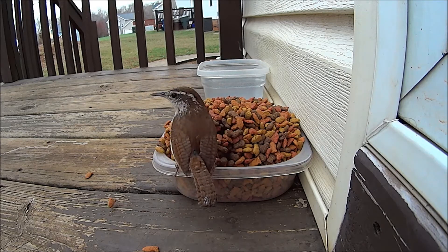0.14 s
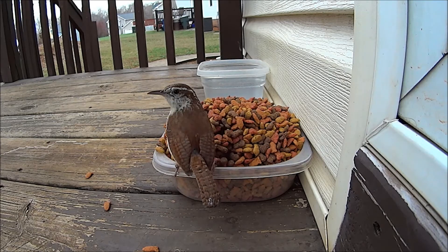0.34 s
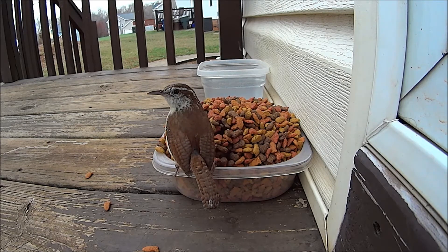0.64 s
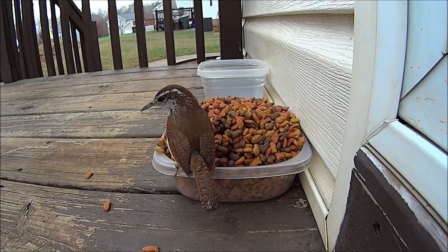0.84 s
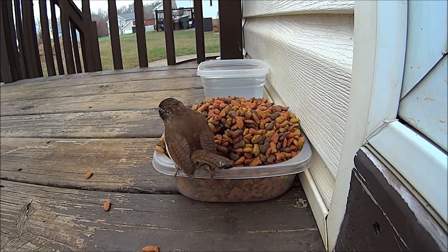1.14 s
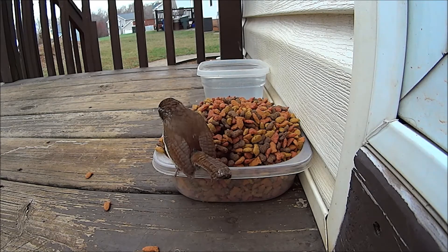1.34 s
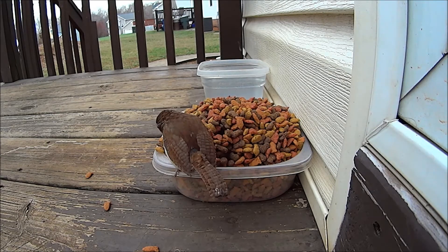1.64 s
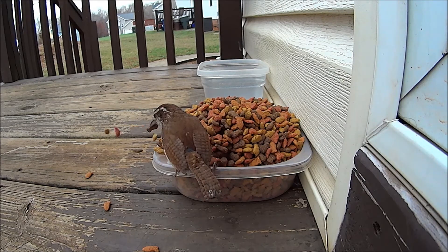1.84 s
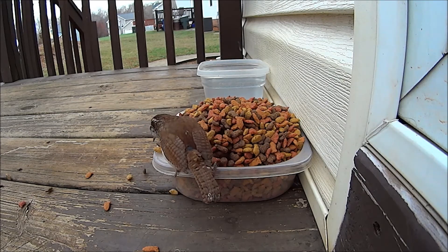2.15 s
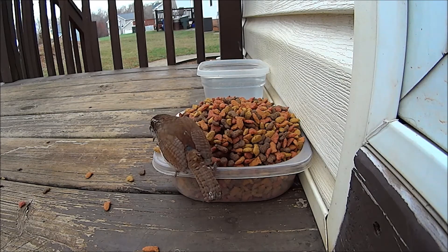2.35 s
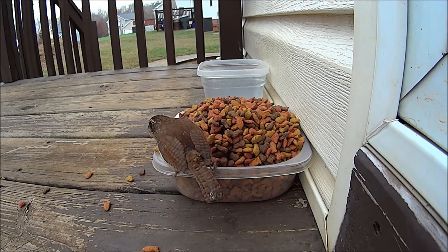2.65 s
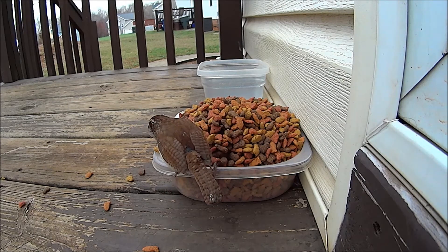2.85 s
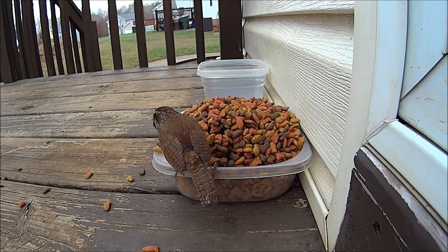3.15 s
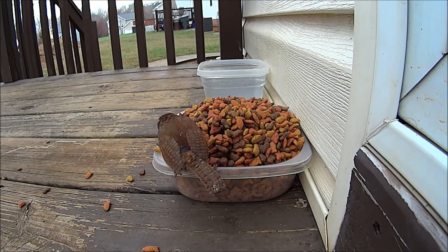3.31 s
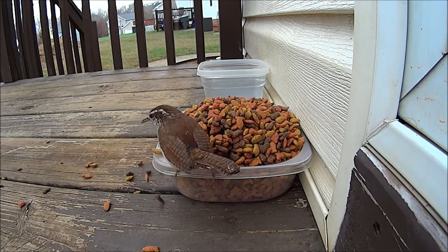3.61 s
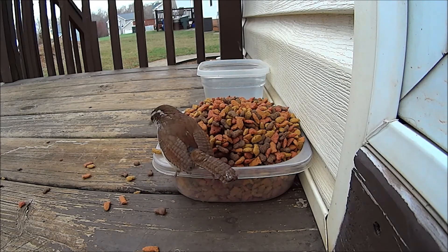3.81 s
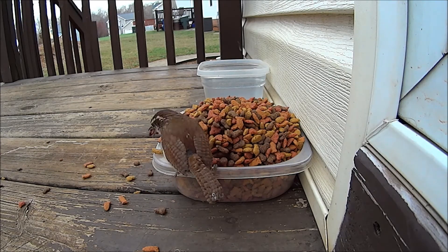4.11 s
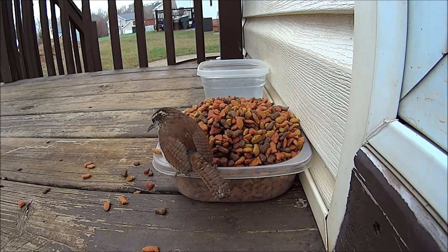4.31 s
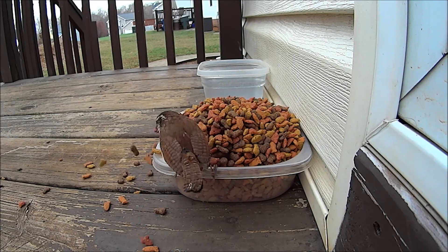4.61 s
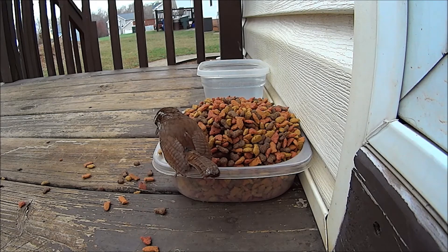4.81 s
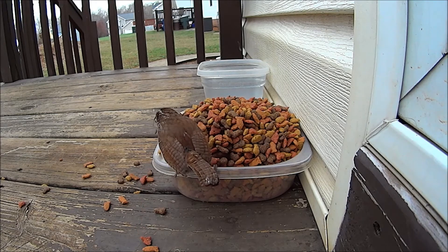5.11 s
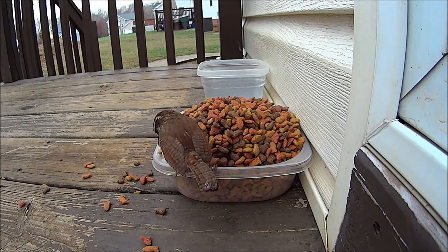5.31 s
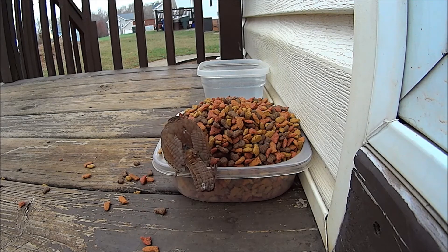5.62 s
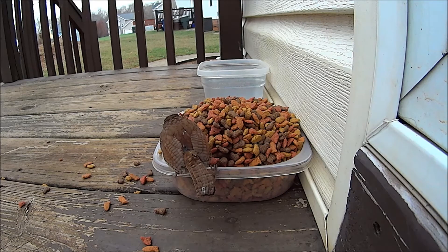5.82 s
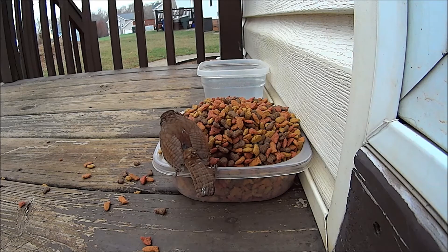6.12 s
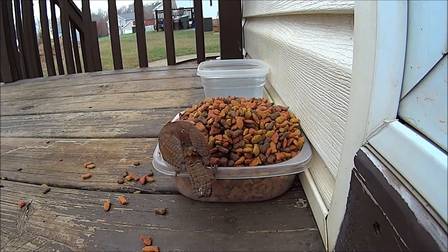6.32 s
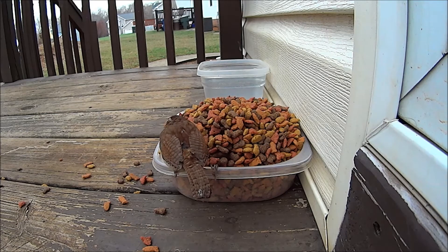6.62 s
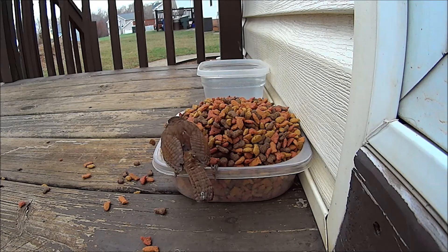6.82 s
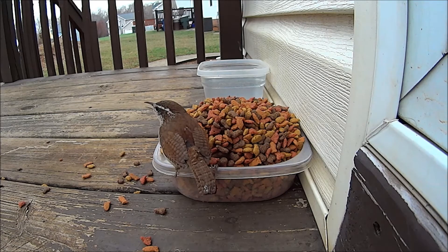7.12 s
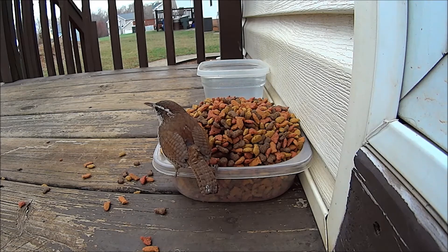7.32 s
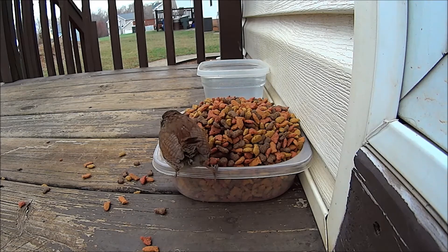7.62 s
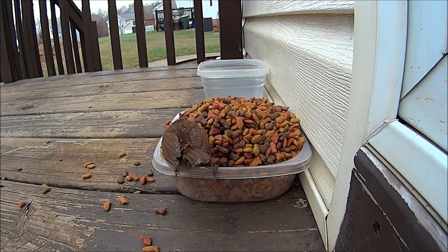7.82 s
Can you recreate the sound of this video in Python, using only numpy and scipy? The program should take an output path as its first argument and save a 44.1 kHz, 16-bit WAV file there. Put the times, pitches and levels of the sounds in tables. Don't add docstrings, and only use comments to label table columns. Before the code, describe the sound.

Close stereo pickup of pellets being flicked about: a few hard clacks at once, a pause, then dense rattling bursts with ticks, rim knocks and drops onto boards. Behind them lie airy hiss, dull traffic rumble and thin far-off bird whistles. A clear, bright bird song swells through five quick repeated phrases with outdoor echo, while the pellet noise continues, then thins to sparse clicks and distant calls.

```python
import sys
import numpy as np
from scipy import signal
from scipy.fft import rfft, irfft, next_fast_len
from scipy.io import wavfile
from scipy.ndimage import uniform_filter1d, map_coordinates

SR = 44100
rng = np.random.default_rng(int(sys.argv[2]) if len(sys.argv) > 2 else 0)


def to_linear_factor(level_db):
    exponent = np.asarray(level_db, float) / 20
    return 10 ** exponent


def generate_wav(sig):
    pcm = np.round(np.clip(np.atleast_2d(sig).T, -1, 1) * 32767).astype(np.int16)
    wavfile.write(sys.argv[1], SR, pcm)


N = 350595

# frequency in Hz, lead in radians.
FAR_LEAD = [(30, 0.27), (100, 0.49), (340, 1.36), (850, 2.55), (2000, 1.96), (3500, 1.17), (6000, 1.27),
            (11000, 0.62)]
# frequency in Hz, left minus right in dB.
FAR_BALANCE = [(60, -0.5), (600, 2), (1500, 2), (2600, 5), (5000, 1.5), (11000, 0)]


def along(points, hz):
    f, v = np.transpose(points)
    return np.interp(np.log(hz + 1), np.log(f + 1), v)


def unit(x):
    return x / np.sqrt(np.mean(x ** 2) + 1e-20)


def wobble(rate, size=N):
    knots = rng.standard_normal(int(size * rate / SR) + 4)
    return map_coordinates(knots, [np.arange(size) * rate / SR])


def filtered(x, response):
    m = next_fast_len(N + 8192)
    return irfft(rfft(x, m) * response(np.fft.rfftfreq(m, 1 / SR)), m)[..., :N]


def band(x, lo_hz, hi_hz):
    return signal.sosfilt(signal.butter(2, [lo_hz, hi_hz], "bandpass", fs=SR, output="sos"), x)


def add(track, s, sound):
    part = track[max(round(s * SR), 0):][:len(sound)]
    part += sound[:len(part)]


def ports(x, lead, left_db):
    half = np.array([[.5], [-.5]])
    return filtered(x, lambda hz: to_linear_factor(half * along(left_db, hz)) * np.exp(1j * half * along(lead, hz)))


def yard(x, walls_db, wet_db, hill_db=-24):
    # frequency in Hz, t60 in seconds.
    fading = [(1500, 1), (2500, 0.24), (3500, 0.44), (5000, 0.44), (9000, 0.12)]
    # echo delay in seconds, level in dB.
    house_walls = [(.006, -13), (.013, -13), (.021, -13), (.033, -13), (.047, -14), (.062, -15), (.09, -21)]
    gap_s, hill_s, hill_t60 = .008, .19, 1.2

    hz, t, z = signal.stft(rng.standard_normal((3, SR)), SR, nperseg=256)
    tail = signal.istft(z * to_linear_factor(-60 * t / along(fading, hz)[:, None]), SR, nperseg=256)[1]
    tail = tail[:1] + 1.17 * tail[1:]
    tail = np.pad(tail, ((0, 0), (round(gap_s * SR), 0)))

    size = tail.shape[1]
    late = np.arange(size) / SR - hill_s
    dull_noise = unit(uniform_filter1d(rng.standard_normal(size), size=7))
    early_level = tail[:, :SR // 20].std()
    tail += early_level * to_linear_factor(hill_db - 60 * late / hill_t60) * (late > 0) * dull_noise
    tail *= to_linear_factor(wet_db) / np.linalg.norm(tail[0])
    for delay, db in house_walls:
        tail[:, round(delay * SR)] += to_linear_factor(db + walls_db)
    echoes = signal.oaconvolve(x[None], tail, axes=1)[:, :N]

    drift = np.arange(N) + 2.8 * wobble(40)
    port = np.repeat([[0], [1]], N, axis=1)
    return x + map_coordinates(echoes, [port, np.tile(drift, (2, 1))], order=2, mode="nearest")


def rush(spectrum, patchy_db):
    # frequency in Hz, likeness of the ports from 0 to 1.
    likeness = [(60, 1), (600, 0.94), (1000, 0.6), (2000, 0.99), (5000, 0.65), (8000, 0.79), (10500, 0.64)]
    z = signal.stft(rng.standard_normal((2, N)), nperseg=512)[2]
    field = uniform_filter1d(rng.standard_normal(z.shape[1:]), 4, 0)
    field = uniform_filter1d(field, 10, 1)
    pair = signal.istft(z * to_linear_factor(patchy_db * unit(field)), nperseg=512)[1][:, :N]

    def spread(hz):
        turn = np.arccos(np.clip(along(likeness, hz), 0, 1)) / 2
        return to_linear_factor(along(spectrum, hz)) * [np.cos(turn), np.sin(turn)]

    same, other = filtered(pair, spread)
    both = ports(np.array([same + other, same - other]), FAR_LEAD, FAR_BALANCE)
    return both / np.sqrt(np.mean(both.mean(0) ** 2))


def air():
    # frequency in Hz, level in dB per Hz.
    traffic = [(12, -57.5), (20, -13), (87, 0), (195, -9), (346, -10), (558, -11.5), (595, -9), (634, -20),
               (900, -36), (1170, -66), (1980, -120)]
    # frequency in Hz, level in dB per Hz.
    hiss_tone = [(410, -19.5), (700, 3), (777, 2), (1560, -3), (2980, -7), (3850, -8.5), (10600, -19),
                 (11200, -17), (14600, -63), (22000, -120)]
    # frequency in Hz, level in dB.
    bird_blur = [(1800, -57), (2300, 4.5), (2600, -1.5), (3000, -1.5), (3600, 0.5), (4100, -20),
                 (4800, -16.5)]
    # time in seconds, then rumble, hiss and chorus levels in dB.
    fades = [(0.0, -42.5, -67, -59), (5.36, -40, -63.5, -53), (7.95, -40.5, -65.5, -71)]
    s, *levels = np.transpose(fades)
    rumble_db, hiss_db, chorus_db = [np.interp(np.arange(N) / SR, s, v) for v in levels]
    rumble = to_linear_factor(rumble_db + .8 * wobble(3)) * rush(traffic, patchy_db=.8)
    hiss = to_linear_factor(hiss_db + 10.0) * rush(hiss_tone, patchy_db=-1.56)
    chorus = to_linear_factor(chorus_db - 4) * rush(bird_blur, patchy_db=2.5)
    return rumble + hiss + chorus


def whistle(rows, rough, waver, overtones=((1, 0),), colour=((1000, 0),)):
    s, hz, db = np.transpose(rows)
    t = np.arange(s[0], s[-1], 1 / SR)

    def smooth(v):
        return uniform_filter1d(np.interp(t, s, v), size=130, mode="nearest")

    pitch = smooth(hz) * (1 + 0.024 * waver * np.tanh(wobble(90, size=len(t))))
    edge = np.minimum(1, np.minimum(t - t[0], t[-1] - t) / 0.002)
    turns = np.cumsum(pitch) / SR + rng.random()
    tone = 0
    for k, overtone_db in overtones:
        tone = tone + to_linear_factor(overtone_db + along(colour, k * pitch)) * np.sin(2 * np.pi * k * turns)
    return tone * edge * to_linear_factor(smooth(db) + 6.0 * rough * wobble(183.0, size=len(t)))


def trill():
    # time in seconds, pitch in Hz, level in dB.
    start = [(2.742, 765, -6), (2.751, 1147, -5), (2.763, 1220, 0), (2.778, 1135, -1), (2.79, 1135, -5)]
    # time in ms, pitch in Hz, level in dB.
    turn = [(0, 1400, 2), (5.06, 1800, 7), (13, 1810, 2.5), (21.02, 1600, 8), (25.61, 1250, -10),
            (31.5, 1080, 4), (34.8, 1200, -8)]
    # start in seconds, level in dB.
    repeats = [(2.797, 1), (2.837, -1), (2.879, -1.5), (2.92, -2.5), (2.961, -5), (3.004, -6.5),
               (3.044, -24)]
    # multiple of the pitch, level in dB.
    partials = [(1, -38.5), (2, -40)]
    # frequency in Hz, level in dB.
    throat = [(900, -10), (1150, -1), (1400, 2), (1700, 0), (2400, 4.5), (3050, -1), (3350, -26)]
    turns = [(s + ms / 1000, hz, db + rel) for s, db in repeats for ms, hz, rel in turn]
    return start[0][0], whistle(start + turns, .35, .4, partials, throat)


def far_birds():
    # start in seconds, length in seconds, from Hz, to Hz, level in dB.
    calls = [(.0, 0.018, 3020, 3080, -44), (0.328, 0.07, 2690, 2680, -57), (.95, .07, 2390, 2370, -62),
             (1.268, .05, 3350, 3670, -62), (7.063, 0.036, 2400, 3120, -53),
             (0.947, 0.085, 3330, 2950, -63), (1.12, 0.034, 2800, 3520, -53.5),
             (1.288, 0.032, 2900, 3640, -55.5), (1.496, 0.068, 3620, 4020, -61),
             (2.258, 0.046, 3250, 4000, -55), (2.453, 0.052, 3460, 3650, -57),
             (2.476, .016, 5460, 4770, -55), (2.533, 0.24, 3005, 2990, -60), (3.15, 0.1, 2760, 2670, -56),
             (3.99, 0.11, 3030, 2996, -45.5), (5.829, 0.016, 6800, 6120, -51.5),
             (6.017, 0.059, 3900, 3900, -53), (6.154, 0.025, 3950, 3940, -56),
             (6.417, 0.038, 3200, 3900, -59), (1.662, 0.05, 3270, 3800, -60),
             (7.879, 0.09, 2940, 3180, -49)]
    # start in seconds, level in dB.
    repeats = [(7.155, -54.5), (7.337, -50.5), (7.513, -50), (7.69, -49.5), (7.865, -50.5)]
    # start in seconds, length in seconds, from Hz, to Hz, level in dB.
    motif = [
        (0, .026, 2330, 3670, 2),
        (.03, .035, 3620, 3590, -10),
        (.07, .015, 3200, 2400, -2),
        (.11, .028, 2470, 2430, 0),
        (0, .045, 2370, 2350, -7),
    ]
    # drop in seconds, hold in seconds, level in dB.
    high_calls = [(1.437, 0.028, -57), (2.409, .042, -54), (3.678, 0.035, -52), (5.45, 0.026, -53),
                  (5.93, 0.035, -46.5)]
    # start in seconds, level in dB.
    hoots = [(0.482, -49), (1.252, -49.5)]
    # time in seconds, pitch in Hz, level in dB.
    hoot_arch = [(0, 1202, -5), (.03, 1546, -0.5), (.075, 1570, -8), (.105, 1330, -8)]
    voice = np.zeros(N)

    slurs = list(calls)
    for s, db in repeats:
        slurs += [(s + ds, length, a, b, db + rel) for ds, length, a, b, rel in motif]
    for s, hold, db in high_calls:
        slurs.append((s - hold, hold, 6820, 6820, db - 4))
        slurs.append((s, .027, 6650, 5900, db))
    for s, length, from_hz, to_hz, db in slurs:
        middle = (length / 2, (from_hz + to_hz) / 2, db)
        rows = [(0, from_hz, db - 0.5), middle, (length, to_hz, db + 1)]
        add(voice, s, whistle(rows, rough=0.54, waver=0.13))

    for s, db in hoots:
        add(voice, s, to_linear_factor(db) * whistle(hoot_arch, .3, .1))

    for when, pitch, slur, size in rng.random((80, 4)):
        hz = 3000 * (.8 + .45 * pitch)
        arc = [(0, hz, -6), (.025, hz * (.9 + .25 * slur), 0), (.06, hz * (.8 + .4 * slur), -6)]
        add(voice, when * N / SR, to_linear_factor(-69 + 5 * size) * whistle(arc, .9, .4))

    add(voice, *trill())
    return ports(yard(voice, walls_db=-3, wet_db=-7), FAR_LEAD, FAR_BALANCE)


def singer():
    # time in ms, pitch in Hz, level in dB.
    rise = [
        [(0, 2480, -14), (5, 2590, -3), (14, 2660, 0), (22, 2710, -1), (25, 2720, -30)],
        [(0, 3800, -18), (5, 3300, -13), (10, 2980, -4), (19, 2915, 0), (24, 2980, -22)],
        [(0, 3020, -12), (5, 3230, -2), (12, 3630, 0), (19, 3860, -2), (25, 3920, -22)],
        [(0, 4300, -14), (5, 4850, -9), (11, 5100, -5), (40, 5200, 0), (80, 5170, -5), (100, 5150, -22)],
    ]
    # time in ms, pitch in Hz, level in dB.
    fall = [
        [(0, 3950, -24), (7, 3450, -15), (13, 3010, -7), (21, 2815, 0), (26, 2740, -24)],
        [(0, 2560, -20), (8, 2530, -3), (16, 2508, 0), (48, 2495, -3), (60, 2490, -14), (94, 2500, -15),
         (99, 2500, -30)],
        [(0, 2900, -6), (6, 2300, 0), (15, 1950, -2), (30, 1750, -10), (60, 1560, -14), (95, 1450, -26)],
    ]
    # rising and falling half starts in seconds, effort in dB, first note's extra dB.
    phrases = [
        (3.6035, 3.798, -6.5, 0),
        (4.077, 4.2775, -3, -0.5),
        (4.55, 4.745, -0.34, -3),
        (5.023, 5.224, -.2, -1),
        (5.499, 5.7015, 0.25, 0),
    ]
    # pitch ratio, waver from 0 to 1, level in dB.
    high_notes = [(.994, 0.28, -36.5), (1.001, 0, -31), (.99, 0.26, -27), (1.005, 0.6, -27),
                  (0.974, 0.62, -32)]
    # start in seconds, level in dB, dB per dB of effort.
    rise_beat = [(0, -15, 2), (0.041, -11.5, 1.34), (0.064, -12, 1.47), (.114, 0, 0)]
    # start in seconds, level in dB, dB per dB of effort.
    fall_beat = [(0, -9.5, 1.52), (0.0433, -14.5, 1.2), (.146, -26.5, 0.3)]
    flutter = [.12, .12, .2, .9, .12, .2, .5]
    # frequency in Hz, left port's lead in radians.
    song_lead = [(1500, 2.14), (2500, 1.04), (3100, 1.18), (3500, 0.25), (4000, 1.97), (5200, .15)]
    # frequency in Hz, left minus right in dB.
    song_balance = [(1500, 5), (2100, 2), (2600, 4.5), (3100, 1.5), (3800, 3.5), (5150, 5)]
    voice = np.zeros(N)
    for phrase, (rise_s, fall_s, effort_db, extra_db) in enumerate(phrases):
        beat = [(rise_s + s, db + k * effort_db) for s, db, k in rise_beat]
        beat += [(fall_s + s, db + k * effort_db) for s, db, k in fall_beat]
        for i, ((s, db), note, rough) in enumerate(zip(beat, rise + fall, flutter)):
            ratio, waver = 1, .06
            if i == 3:
                ratio, waver, db = high_notes[phrase]
            if i == 0:
                db = db + extra_db
                ratio = 1.085 if phrase == 0 else 1
            rows = np.array(note) * [1 / 1000, ratio, 1]
            add(voice, s, to_linear_factor(db) * whistle(rows, rough, waver))
    return ports(yard(voice, walls_db=-8, wet_db=-8.5, hill_db=-19), song_lead, song_balance)


def scrapes():
    # start in seconds, length in seconds, level in dB.
    slides = [(1.769, 0.064, -49), (1.955, 0.015, -32.5), (1.981, 0.016, -36), (2.123, 0.0076, -42),
              (2.16, 0.05, -69), (3.307, 0.024, -41.5), (3.34, 0.027, -48), (3.512, 0.0052, -31),
              (4.359, 0.032, -47), (4.51, 0.039, -47), (4.683, 0.12, -42.5), (5.019, 0.025, -46.5),
              (5.501, 0.019, -48.5), (5.546, .03, -50), (6.356, 0.011, -53)]
    swell = np.zeros(N)
    for s, length, db in slides:
        add(swell, s, to_linear_factor(db) * np.hanning(round(length * SR)) ** 0.099)
    grains = uniform_filter1d((rng.random(N) < .02) * rng.exponential(size=N), size=12)
    grit = rng.standard_normal((3, N))
    grit = grit[:1] + 0.34 * grit[1:]
    return swell * unit(band(grit * (1.2 + unit(grains)), 1100, 7200))


def contacts():
    # start in seconds, crack peak in dB, ring in Hz,
    # body and edge levels in dB over the crack.
    snaps = [(0.0229, -6.5, 6100, -6.5, -60), (0.1791, -17, 6900, -4, -30), (0.2713, -28.5, 6930, -5, -46),
             (1.7849, -24, 4700, -8, -36), (1.8282, -30, 4700, -6, -53), (1.8871, -12, 6900, -10, -39),
             (1.8894, -11.5, 7700, -5, -50), (1.9206, -19, 6100, -10, -51), (1.9501, -17, 5900, -24, -29),
             (1.973, -19, 7300, -12, -46), (2.1622, -10, 5250, -34, -54), (2.7326, -36, 8640, -10, -60),
             (3.1015, -35, 4040, -10, -60), (3.3734, -14.5, 4700, -4, -55), (3.3806, -16, 7100, -21, -45),
             (3.3832, -8, 7200, -11, -35), (3.4541, -8.5, 6200, -10.5, -40),
             (3.4871, -15.5, 5400, -21, -27), (3.5764, -9, 7300, -11, -49), (3.8014, -32.5, 6900, -12, -44),
             (4.2192, -8, 7700, -12, -53), (4.3863, -16, 7140, -1.5, -53), (4.5324, -35, 7500, -6, -60),
             (4.5571, -30, 9000, -5, -56), (4.7051, -13.5, 7140, -3, -63), (5.0276, -32, 9500, -6, -62),
             (6.544, -32, 3700, -8, -50), (6.7053, -22.5, 5300, -24, -48), (6.8166, -11.5, 5060, -43, -25),
             (7.8681, -30.5, 4300, -8, -50)]
    # start in seconds, crack in dB, ring in Hz, body dB, edge dB.
    rim_knocks = [(0.0934, -11.5, 7300, -11, -55), (1.772, -32.5, 4200, -13, -60),
                  (1.8081, -30.5, 3880, -3, -56), (1.8145, -25.5, 7200, -4, -52),
                  (1.9302, -23, 6500, -12, -23), (1.9566, -17.5, 5300, -24, -45),
                  (1.9611, -19.5, 4200, -6, -50), (1.9643, -19.5, 3700, -8, -47),
                  (1.9849, -20, 3270, -13, -59), (2.0741, -20, 7200, -7, -35),
                  (2.1426, -22, 4070, -20, -40), (3.306, -31, 5700, -14, -60),
                  (3.3173, -27.5, 4530, -8, -55), (3.3936, -28.5, 5800, 4.5, -60),
                  (3.4266, -33.5, 3800, 6, -60), (3.5093, -24, 4250, -13, -60),
                  (3.5126, -22, 4100, -12, -53), (3.5224, -16.5, 3160, -4, -48),
                  (3.5376, -19.5, 3240, -8, -60), (3.5521, -16, 5230, -7, -37),
                  (3.6868, -14, 7270, -7, -51), (3.7711, -27.5, 7200, 6.5, -44),
                  (4.0598, -29.5, 6470, -2, -62), (4.3956, -19, 8700, -17, -48),
                  (4.4483, -24.5, 5500, -4, -50), (4.7009, -11, 5570, -5, -60),
                  (6.5306, -29, 4130, -15, -60), (6.5364, -30.5, 4100, -16, -60),
                  (6.9169, -22.5, 3270, -1.5, -60)]
    # start in seconds, crack in dB, ring in Hz, body dB, edge dB.
    deck_drops = [(0.234, -40, 3000, 4, -60), (2.0536, -20, 3220, 1, -60), (2.0923, -37, 3800, 6, -50),
                  (2.1273, -34, 3020, 4, -42), (2.1823, -34, 4200, -4, -42), (3.5827, -24, 3100, -1, -33),
                  (3.621, -36, 6200, 1, -58), (3.6354, -29, 5500, -9, -32), (4.2755, -21.5, 5520, 5, -60),
                  (4.7437, -24.5, 5600, -8.5, -61), (4.8441, -25, 5470, 6, -60),
                  (6.6997, -39, 3450, -1, -60)]
    # start in seconds, crack in dB, ring in Hz, body dB, edge dB.
    shoves = [(3.6702, -29, 6300, -4, -52), (4.3777, -26, 7400, -10, -60), (4.5218, -28.5, 5700, 3, -60),
              (4.7123, -22.5, 5600, -7, -60), (4.7722, -32, 5600, -7, -60)]
    # start in seconds, crack in dB, ring in Hz, body dB, edge dB.
    bounces = [(0.2103, -40, 4300, -2, -59), (1.873, -27, 3400, -18, -60), (2.0505, -25, 3720, 2.5, -39),
               (2.1539, -25, 3700, -12, -28), (2.1686, -24, 4000, -5, -39), (2.2298, -37, 4000, -4, -60),
               (3.3671, -21, 4700, -11, -57), (3.3751, -15, 5000, 1.5, -49), (3.3849, -26, 7500, -8, -46),
               (3.4468, -29, 3400, -2, -60), (4.2271, -28, 5560, 5.5, -60), (4.4742, -41, 5600, 9, -60),
               (4.5639, -28.5, 5600, -6, -60), (4.596, -27.5, 5800, -14, -49), (4.7212, -22, 7400, -3, -60),
               (6.807, -28.5, 3480, -1, -60)]
    # start in seconds, crack in dB, ring in Hz, body dB, edge dB.
    ticks = [(0.2612, -51, 4300, -2, -57), (1.8945, -30, 5100, -20, -56), (1.9009, -24, 5300, -20, -46),
             (1.9433, -37, 8000, -17, -23), (2.0379, -43, 3000, -2, -60), (2.174, -41, 4700, 3, -24),
             (2.1796, -39, 3900, -3, -35), (2.217, -39, 4800, 8, -60), (2.2698, -54, 3400, 3, -50),
             (2.2997, -38, 4000, -14, -60), (3.3535, -31, 3700, -14, -58), (3.3593, -34, 6000, -11, -60),
             (3.3992, -32, 5800, -11, -49), (3.4138, -44, 4000, 1, -57), (3.4374, -37, 8000, -9, -48),
             (3.451, -20, 5400, -18, -43), (3.6443, -23.5, 7000, -16, -44), (3.7218, -33, 7300, -4, -60),
             (4.0795, -16, 8700, -10, -54), (4.1733, -37, 7400, -6, -60), (4.1893, -7.5, 7440, -18, -26),
             (4.2087, -15, 7100, -26, -42), (4.3229, -36, 7100, -10, -60), (4.4136, -33, 8300, -5, -62),
             (4.456, -39, 7300, 10, -59), (4.4815, -37, 5900, 12, -59), (4.5359, -34, 8900, -6, -46),
             (4.5885, -34, 5800, -18, -49), (4.6893, -23, 5600, -29, -58), (5.019, -27, 8300, -12.5, -60),
             (6.3642, -32, 5570, -5, -60), (6.6094, -29.5, 5700, -24, -49)]
    # frequency in Hz, level in dB, t60 in seconds.
    tub_modes = [(239, -9, 0.68), (544, 0, 0.12), (1124, 3, 0.023)]
    # contacts, knock in dB over the crack, crack t60 in seconds.
    kinds = [(snaps, -29, .0042), (rim_knocks, -11, .006), (deck_drops, -4, .008),
             (shoves, -6, .012), (bounces, -25, .0045), (ticks, -27, .0033)]

    hits = np.array([(*row, *kind) for rows, *kind in kinds for row in rows])
    s, db, hz, body_db, edge_db, knock_db, t60 = hits.T[:, :, None, None]
    t = np.arange(SR // 20) / SR
    luck = rng.standard_normal((len(s), 12, len(t)))

    def noise(k, own):
        return luck[:, k:k + 1] + own * luck[:, k + 1:k + 3]

    def fade(level_db, fade_t60):
        return to_linear_factor(level_db - 60 * t / fade_t60) * (1 - np.exp(-t / .0001))

    def peaked(v):
        return v / abs(v).max((1, 2), keepdims=True)

    crack = peaked(band(noise(0, own=0.36) * (fade(0, t60) + fade(-23.5, 0.034)), 2690, 10400))
    ring = fade(-6, t60) * np.sin(2 * np.pi * hz * t)
    body = peaked(band(noise(3, own=0.15) * fade(0, 0.0093), 800, 3200))
    thud = band(noise(6, own=0.2) * fade(knock_db + 9, 0.051), 240, 1720)
    edge = peaked(band(noise(9, own=1.0) * fade(0, 0.0027), 11500, 17000))

    pan = to_linear_factor(np.array([[1], [-1]]) * (0.78 * luck[:, :1, :1] - 2.5))
    mix = to_linear_factor(2.0) * peaked(crack + ring) + to_linear_factor(body_db - 0.5) * body + to_linear_factor(3) * thud
    sounds = to_linear_factor(db) * pan * mix
    tops = to_linear_factor(db + edge_db + 44) * pan * edge
    strengths = to_linear_factor(db + knock_db - 5).ravel()

    dull, bright, blows = np.zeros((2, N)), np.zeros((2, N)), np.zeros(N)
    for when, sound, top, blow in zip(s.ravel(), sounds, tops, strengths):
        for port in range(2):
            add(dull[port], when - .0003, sound[port])
            add(bright[port], when - .0003, top[port])
        blows[round(when * SR)] = blow

    long = np.arange(SR // 5) / SR
    tub = 0
    for mode_hz, mode_db, mode_t60 in tub_modes:
        tub = tub + to_linear_factor(mode_db - 60 * long / mode_t60) * np.sin(2 * np.pi * mode_hz * long)
    return dull + signal.oaconvolve(blows, tub)[:N], bright


def pellets():
    # frequency in Hz, level in dB.
    soft_top = [(11100, 0), (12000, -16), (13000, -40)]
    # frequency in Hz, left port's lead in radians.
    near_lead = [(30, .1), (430, 1.6), (1400, 1.9), (2500, 1.05), (3700, .5), (6500, 0), (9000, -.3),
                 (11000, 0)]
    # frequency in Hz, left minus right in dB.
    near_balance = [(100, -2), (1100, 7), (3600, 11.5), (6500, 7.5), (8300, 7), (11000, 6)]
    dull, bright = contacts()
    near = filtered(dull + scrapes(), lambda hz: to_linear_factor(along(soft_top, hz)))
    echoes = yard(near[0], walls_db=-18, wet_db=4.5) - near[0]
    near = near + to_linear_factor(-22.5) * echoes
    edges = filtered(bright, lambda hz: hz > 11300)
    return ports(near + edges, near_lead, near_balance)


def scene():
    return air() + far_birds() + singer() + pellets()


def roll_off(x):
    return signal.sosfilt(signal.butter(12, 16300, fs=SR, output="sos"), x)


def record(dry):
    # frequency in Hz, level in dB.
    mic_response = [(20, 0), (11000, 0), (11230, -32), (13000, -36), (15800, -43), (16400, -70)]
    mix = filtered(dry, lambda hz: to_linear_factor(along(mic_response, hz)))
    return roll_off(mix)


dry = scene()
out = record(dry)
generate_wav(out)
```